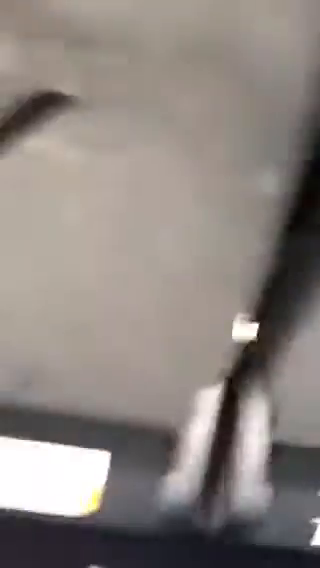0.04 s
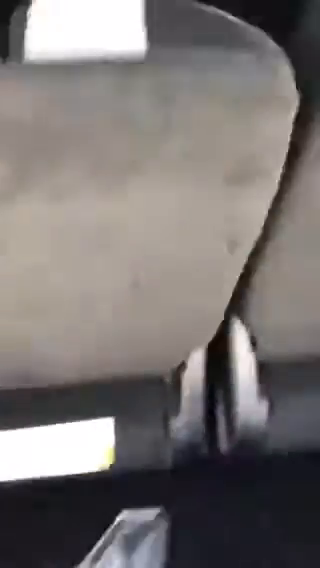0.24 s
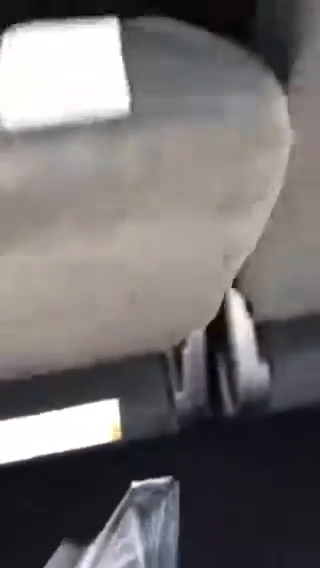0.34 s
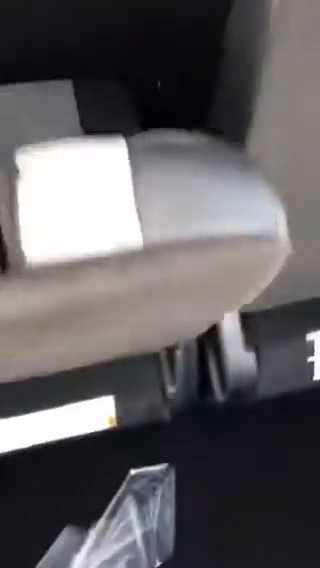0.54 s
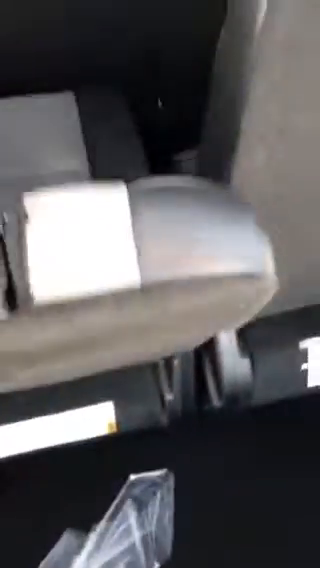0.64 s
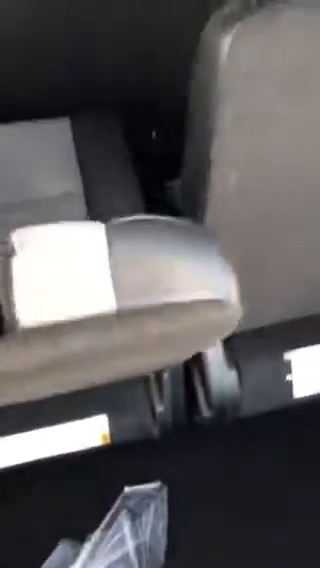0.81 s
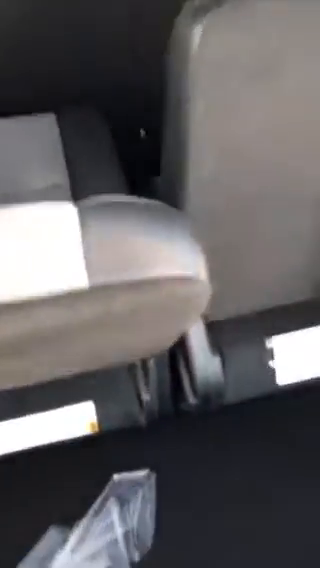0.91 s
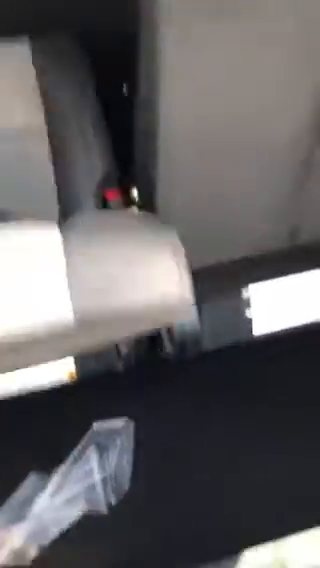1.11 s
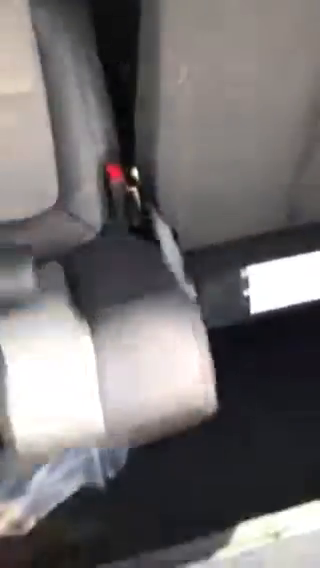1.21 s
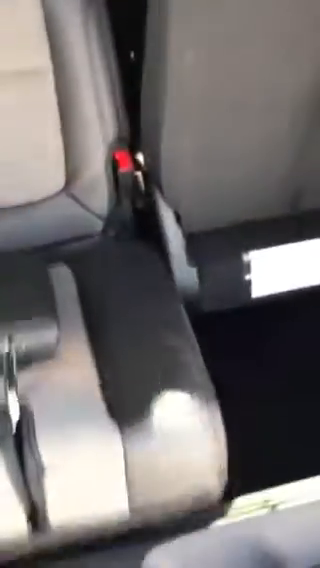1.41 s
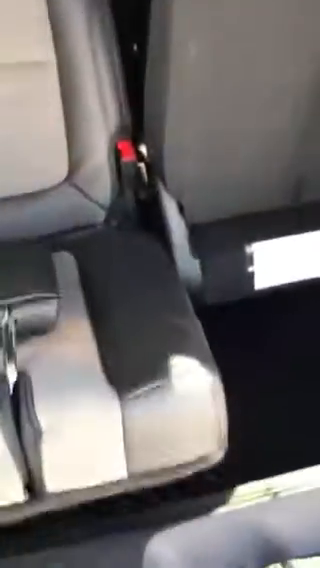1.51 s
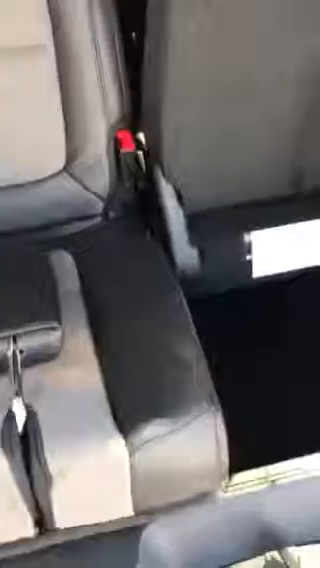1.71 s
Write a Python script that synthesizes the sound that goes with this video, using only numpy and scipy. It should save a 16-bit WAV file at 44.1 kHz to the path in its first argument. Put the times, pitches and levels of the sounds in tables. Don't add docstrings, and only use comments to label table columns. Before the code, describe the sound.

A car seat being folded: sharp metal latch clack with brief spring ring, a cluster of dull knocks and fabric rubs, softer bumps, then a padded clap; close handheld microphone, dry cabin, quiet low rumble.

```python
import sys
import numpy as np
from scipy import signal
from scipy.fft import rfft, irfft
from scipy.io import wavfile
from scipy.ndimage import uniform_filter1d

SR = 44100
rng = np.random.default_rng(int(sys.argv[2]) if len(sys.argv) > 2 else 0)


def makeup_ratio(level_db):
    decades = np.asarray(level_db, float) / 20
    return 10 ** decades


def dump(signal):
    limited = np.clip(np.atleast_2d(signal).T, -1, 1)
    pcm = np.round(limited * 32767).astype(np.int16)
    wavfile.write(sys.argv[1], SR, pcm)


N = 77175

# start_s, peak_db, rattle_s, brightness_db_per_octave
LATCH_BLOWS = [
    (0.2138, -8.5, 0.00344, 4.5),
    (.2155, -5, 0.0064, 1.5),
    (0.2186, -6.5, 0.00586, 2),
    (.2225, -16.5, 0.0017, -3.5),
    (0.228, -22, 0.005, 1),
    (0.2365, -16, 0.0049, -0.5),
    (0.2406, -17.5, 0.007, -1),
    (0.2577, -24, 0.00895, 0),
    (0.276, -37.5, 0.0035, 1.5),
]
# pitch_hz, level_db, t60_s
LATCH_MODES = [(926, 6, 0.0686), (1560, -1.5, 0.093), (1150, 0, 0.0432), (2052, 3.5, 0.0433),
               (2506, 2, 0.071), (2727, -2.5, 0.044), (3213, -0.5, 0.07), (3510, -12, 0.064),
               (4224, -1.5, 0.05), (4656, -7, 0.069), (5130, -7.5, 0.067), (5740, -5.5, 0.056),
               (6337, -11, 0.098), (7630, -17, 0.0276)]
# freq_hz, level_db
LATCH_CRACK = [(250, -39.5), (450, -20), (680, -8.5), (1000, -7.5), (1400, -5), (4300, -15.5), (12500, -20),
               (16000, -31)]
# start_s, level_db, pitch_hz
SPRINGS = [
    (.222, -33, 2433),
    (.2485, -36, 2433),
    (.2595, -40, 2433),
    (.183, -46, 3190),
    (.243, -39, 1580),
]
# start_s, peak_db, contact_s, brightness_db_per_octave
LANDING_SLAPS = [(1.4084, -18.5, 0.00184, 9.5), (1.4102, -9, 0.00487, 1), (1.4144, -13.5, 0.00102, 5.5),
                 (1.418, -11.5, 0.0053, 1.5), (1.421, -9.5, 0.00296, -4), (1.425, -9, 0.0029, 3),
                 (1.4284, -9, 0.0031, 2), (1.434, -16, 0.00346, -3), (1.4396, -23, 0.0018, 5.5),
                 (1.449, -31, 0.0056, 8), (1.454, -16.5, 0.00325, -1), (1.461, -19, 0.00575, 3.5),
                 (1.4667, -24.5, 0.0025, 1.5), (1.474, -29, 0.0037, 1), (1.506, -35, 0.0062, 4)]
# freq_hz, level_db
SLAP_SPECTRUM = [(180, -11.5), (300, 3.5), (546, -7.5), (870, -8), (1300, -4), (2170, -11.5), (2840, -16.5),
                 (16000, -44)]
# pitch_hz, level_db, t60_s
FRAME_MODES = [(298, 3, 0.0172), (390.8, 9.5, 0.046), (640.7, -0.5, 0.0278), (896.3, 0.5, 0.0484),
               (1318, -6, 0.0206), (1664, -4.5, 0.029), (1880, -2, 0.0143), (2231, -8, 0.029),
               (2640, -17.5, 0.022), (3100, -20, 0.0183), (3736, -21, 0.0135)]
# start_s, peak_db, brightness_db_per_octave
TRIM_SNAPS = [(0.626, -41.5, 8), (0.6423, -49, -5), (0.649, -38.5, 7), (0.677, -30, 2), (0.7004, -33, -5.5),
              (0.7156, -23, -2.5), (0.743, -38.5, 7), (1.039, -50, 7), (1.056, -49.5, 14),
              (1.123, -49.5, 9.5), (1.2085, -41.5, 1), (1.248, -46.5, 5)]
# start_s, peak_db, pitch_hz, t60_s
THUDS = [(0.036, -25.5, 56.5, 0.1384), (0.202, -31.5, 79.4, 0.09), (.325, -21.5, 138, 0.045),
         (0.441, -33, 171.7, 0.067), (0.561, -25.5, 63.6, 0.128), (0.2138, -10.5, 448, 0.0181),
         (1.128, -25.5, 67.6, 0.178), (1.19, -26.5, 75.3, 0.178), (0.989, -27.5, 62.8, 0.12),
         (1.291, -25, 79.8, 0.075), (1.685, -33.5, 99, 0.082), (.483, -28.5, 558, 0.0184),
         (0.224, -19.5, 122.7, 0.343), (0.2363, -3.5, 378.3, 0.0262), (0.244, -15.5, 49.1, 0.211),
         (0.29, -13.5, 238.9, 0.0373), (0.294, -19.5, 93.6, 0.0526), (0.392, -24, 125.3, 0.0622),
         (.481, -25.5, 229.8, 0.065), (0.53, -27.5, 141.4, 0.193), (.542, -23, 194.5, 0.066),
         (.589, -15, 183.1, 0.0344), (0.593, -11, 66.8, 0.0524), (0.635, -18, 144.8, 0.094),
         (0.648, -19.5, 157.5, 0.045), (0.673, -22.5, 205.7, 0.0696), (0.697, -14.5, 170.6, 0.0726),
         (0.7138, -15, 287.7, 0.0407), (0.718, -15, 75.3, 0.1072), (.79, -26, 96.2, 0.242),
         (1.028, -21, 157.4, 0.052), (1.063, -21.5, 212.6, 0.023), (1.081, -19, 168.7, 0.097),
         (1.095, -21, 302, 0.0448), (1.113, -23.5, 208.2, 0.106), (1.204, -23, 220, 0.0379),
         (1.277, -26.5, 169.2, 0.06), (1.346, -20.5, 82.3, 0.145), (1.4119, -17, 367.5, 0.072),
         (1.418, -15, 116.2, 0.076), (1.439, -18.5, 61.23, 0.33), (1.464, -18.5, 265.7, 0.052)]
# start_s, peak_db, pitch_hz, t60_s
TICKS = [(.161, -38.5, 3894, 0.032), (.167, -24, 1636, 0.036), (.1675, -24.5, 2098, 0.0364),
         (.168, -27.5, 881, 0.031), (0.168, -32.5, 4410, 0.052), (.172, -21, 1540, 0.0188),
         (0.177, -35, 2155, 0.038), (.201, -28, 3170, 0.0335), (.2138, -2, 1054, 0.0237),
         (0.194, -31, 3188, 0.067), (0.196, -28.5, 2200, 0.16), (.452, -41, 2350, 0.101),
         (0.486, -35.5, 2462, 0.0226), (.494, -38, 2668, 0.0304), (.606, -37.5, 1970, 0.013),
         (0.625, -38.5, 2470, 0.0135), (.6435, -28, 1288, 0.0172), (.66, -34.5, 3990, 0.0185),
         (0.667, -42, 3870, 0.0225), (1.4135, -15, 875.3, 0.0483), (0.677, -32.5, 1390, 0.023),
         (.686, -42.5, 3410, 0.019), (0.63, -40, 2990, 0.0177), (0.65, -36.5, 3880, 0.017),
         (.661, -32, 2160, .02), (0.662, -28, 1150, 0.047), (.7152, -26.5, 1972, 0.0105),
         (.721, -26, 1210, 0.0104), (0.7457, -44.5, 5220, 0.0088), (1.097, -30, 948, 0.0088),
         (1.2087, -31.5, 2146, 0.0188), (1.211, -48, 3350, 0.056), (1.412, -42, 3380, 0.029),
         (1.428, -27, 3772, 0.0357), (1.498, -26.5, 612, 0.0242)]
# start_s, length_s, level_db, brightness_db_per_octave
SCRAPES = [(0, 0.0293, -54, 8.5), (0, 0.31, -53.5, 4), (0.166, 0.027, -59.5, 20), (0.192, 0.0544, -38.5, 3),
           (0.419, 0.1646, -53, -0.5), (0.629, 0.081, -41.5, 1), (0.702, 0.0598, -42, -2.5),
           (1.029, 0.062, -55, 0.5), (1.335, 0.191, -52.5, 1.5), (1.413, 0.017, -40.5, -6.5),
           (1.435, 0.0527, -37, -6.5), (1.661, 0.085, -57.5, 5.5), (0.765, 0.78, -65, 6.5),
           (1.238, 0.056, -62, 4.5)]
# freq_hz, level_db
FABRIC = [(240, -37), (400, 7), (520, -6), (1250, -4.5), (1900, -10), (4110, -16), (16000, -41.5)]
# time_s, rumble_db
MOTION = [
    (0.0, -42),
    (0.12, -39.5),
    (0.432, -36.5),
    (0.662, -36.5),
    (0.818, -39),
    (1.018, -39),
    (1.178, -40.5),
    (1.35, -36.5),
    (1.564, -40.5),
    (1.75, -44.5),
]
# freq_hz, level_db
RUMBLE = [(12, -65), (20, -58), (54, 4), (141, -11.5), (200, -25.5), (321, -15), (500, -33), (650, -34),
          (1100, -120)]
# freq_hz, level_db
WASH = [(200, -17), (400, -3), (720, -4), (1060, -3.5), (1880, -12), (2800, -18.5), (4100, -21.5),
        (8000, -31), (16000, -36)]
# time_s, level_db
HUM = [
    (0, -54),
    (.2, -62.5),
    (.4, -74.5),
    (1.35, -53.5),
    (1.58, -49),
    (1.75, -53),
]


def evened(x):
    return x / np.sqrt(np.mean(x ** 2) + 1e-20)


def coloured(x, spectrum, tilt_db=0):
    hz = np.fft.rfftfreq(len(x), 1 / SR) + 1
    points_hz, points_db = np.transpose(spectrum)
    gain_db = np.interp(np.log(hz), np.log(points_hz), points_db) + tilt_db * np.log2(hz / 2000)
    return evened(irfft(rfft(x) * makeup_ratio(gain_db), len(x)))


def add(mix, start_s, sound):
    part = mix[round(start_s * SR):][:len(sound)]
    part += sound[:len(part)]


def ring(x, hz, t60_s):
    r = makeup_ratio(-60 / (t60_s + 0.000395) / SR)
    w = 2 * np.pi * hz / SR
    return signal.lfilter([np.sin(w)], [1, -2 * r * np.cos(w), r * r], x)


def double_ring(x, hz, t60_s):
    return ring(ring(x, hz, t60_s), hz, t60_s)


def burst(noise, spectrum, contact_s, tilt_db, t60_s):
    t = np.arange(len(noise)) / SR
    sag_db = -1.5 * np.minimum(t / contact_s, 1)
    fall_db = -60 * np.maximum(t - contact_s, 0) / t60_s
    return np.minimum(t / 0.00065, 1) * coloured(noise, spectrum, tilt_db) * makeup_ratio(sag_db + fall_db)


def struck_modes(noise, contact_s, tilt_db, modes, t60_share=1):
    t = np.arange(len(noise)) / SR
    contacts = (noise ** 3 + 12 * (t == 0)) * np.exp(-4.5 * t / contact_s)
    out = np.zeros(len(noise))
    for k, (hz, mode_db, t60_s) in enumerate(modes):
        gain = (-1) ** k * makeup_ratio(mode_db + tilt_db * np.log2(hz / 2000))
        out += gain * ring(contacts, hz, t60_share * t60_s)
    return out / out[:440].std()


def latch():
    out = np.zeros(N)
    draws = rng.standard_normal((len(LATCH_BLOWS), 2, 6000))
    for (start_s, db, rattle_s, tilt_db), (rattle, hiss) in zip(LATCH_BLOWS, draws):
        crack = burst(hiss, LATCH_CRACK, rattle_s, tilt_db, t60_s=0.0159)
        steel = struck_modes(rattle, rattle_s, tilt_db, LATCH_MODES, t60_share=0.24)
        add(out, start_s, makeup_ratio(db - 13.5) * (crack + steel))
    return out


def springs():
    out, t = np.zeros(N), np.arange(6000) / SR
    for start_s, db, hz in SPRINGS:
        add(out, start_s, makeup_ratio(db - 60 * t / 0.2) * np.sin(2 * np.pi * hz * t))
    return out


def landing():
    out = np.zeros(N)
    draws = rng.standard_normal((len(LANDING_SLAPS), 2, 4000))
    for (start_s, db, contact_s, tilt_db), (hiss, knocks) in zip(LANDING_SLAPS, draws):
        slap = burst(hiss, SLAP_SPECTRUM, contact_s, tilt_db, t60_s=0.0338)
        frame = struck_modes(knocks, contact_s, tilt_db, FRAME_MODES)
        add(out, start_s, makeup_ratio(db - 15.5) * slap + makeup_ratio(db - 17.5) * frame)
    return out


def trim_snaps():
    out = np.zeros(N)
    for (start_s, db, tilt_db), noise in zip(TRIM_SNAPS, rng.standard_normal((len(TRIM_SNAPS), 4000))):
        add(out, start_s, makeup_ratio(db) * burst(noise, FABRIC, 0.000515, tilt_db, t60_s=0.0066))
    return out


def thuds():
    rise_cycles, sag, puff_db = 0.249, 0.144, -9
    out, t = np.zeros(N), np.arange(9000) / SR
    for (start_s, db, hz, t60_s), noise in zip(THUDS, rng.standard_normal((len(THUDS), len(t)))):
        fade = makeup_ratio(-60 * t / t60_s)
        rise = 1 - np.exp(-(t * hz / rise_cycles) ** 2)
        swing_hz = hz * (1 - sag + sag * fade)
        swing = np.sin(2 * np.pi * np.cumsum(swing_hz) / SR)
        puff = evened(double_ring(noise, 1.804 * hz, 1.33 / hz))
        add(out, start_s, makeup_ratio(db) * rise * fade * (swing + makeup_ratio(puff_db) * puff))
    return out


def ticks():
    level_db, shake_cycles, shake_db = -6, 3.76, -2
    out, t = np.zeros(N), np.arange(3000) / SR
    for (start_s, db, hz, t60_s), noise in zip(TICKS, rng.standard_normal((len(TICKS), len(t)))):
        shake = evened(np.diff(double_ring(noise, hz, shake_cycles / hz), prepend=0))
        envelope = makeup_ratio(db + level_db - 60 * t / t60_s) * np.minimum(t / 0.000294, 1)
        add(out, start_s, envelope * (np.sin(2 * np.pi * hz * t) + makeup_ratio(shake_db) * shake))
    return out


def scrapes():
    grains_per_s, grain_db = 4500, 2.8
    out, t = np.zeros(N), np.arange(16000) / SR
    draws = rng.random((len(SCRAPES), 3, len(t)))
    for (start_s, length_s, db, tilt_db), (chance, size, side) in zip(SCRAPES, draws):
        sizes = makeup_ratio(-grain_db * np.log(size + 0.0063))
        grains = (chance < grains_per_s / SR) * np.sign(side - 0.5) * sizes
        x = np.minimum(t / length_s, 1)
        swell = np.sqrt(np.sin(np.pi * x ** 0.75)) * (x < 1)
        add(out, start_s, makeup_ratio(db) * swell * coloured(grains, FABRIC, tilt_db))
    return out


def cabin(x):
    t = np.arange(8000) / SR
    sparse = (rng.random(len(t)) < 0.05) * (t > 0.002)
    tail = rng.choice([-1., 1.], len(t)) * sparse * makeup_ratio(-60 * t / 0.07)
    tail = signal.lfilter(*signal.butter(1, 3000, fs=SR), tail)
    return signal.fftconvolve(x, tail / np.linalg.norm(tail))[:N]


def motion_db():
    return np.interp(np.arange(N) / SR, *np.transpose(MOTION))


def busy_db():
    return motion_db() - motion_db().mean()


def rumble():
    return coloured(rng.standard_normal(N), RUMBLE) * makeup_ratio(motion_db())


def shuffle():
    pitch_hz, width_hz, level_db, follows, lump_db = 220, 226, -46, 2.48, 4
    lump = round(0.0205 * SR)
    lumps = evened(uniform_filter1d(uniform_filter1d(rng.standard_normal(N), lump), lump))
    rub = evened(double_ring(rng.standard_normal(N), pitch_hz, 2.304 / width_hz))
    return rub * makeup_ratio(level_db + follows * busy_db() + lump_db * lumps)


def traffic_wash():
    level_db, follows, patch_db = -49.5, 0.031, 1.5
    z = signal.stft(coloured(rng.standard_normal(N), WASH), nperseg=512)[2]
    patches = uniform_filter1d(rng.standard_normal(z.shape), size=6, axis=0)
    patches = evened(uniform_filter1d(patches, size=8, axis=1))
    wash = evened(signal.istft(z * makeup_ratio(patch_db * patches), nperseg=512)[1][:N])
    return wash * makeup_ratio(level_db + follows * busy_db())


def engine_hum():
    pitch_hz, width_hz = 310, 18
    hum = ring(ring(rng.standard_normal(N), pitch_hz, 2.2 / width_hz), pitch_hz, 0.03)
    return evened(hum) * makeup_ratio(np.interp(np.arange(N) / SR, *np.transpose(HUM)))


def scene():
    seat = latch() + springs() + landing() + trim_snaps() + ticks() + scrapes()
    background = rumble() + shuffle() + traffic_wash() + engine_hum()
    return (seat + makeup_ratio(-13) * cabin(seat) + thuds() + background)[None]


def low_pass(x):
    return signal.sosfilt(signal.butter(12, 16610, fs=SR, output="sos"), x)


def record(dry):
    low_cut_hz, ceiling, edge_hz = 30, 0.61, 15600
    x = signal.lfilter(*signal.butter(2, low_cut_hz, "high", fs=SR), dry)
    x = ceiling * np.tanh(x / ceiling)
    edge = signal.firwin(301, edge_hz, window=("kaiser", 8), fs=SR)
    x = signal.oaconvolve(x, edge[None], "same")
    return low_pass(x)


dry = scene()
out = record(dry)
dump(out)
```